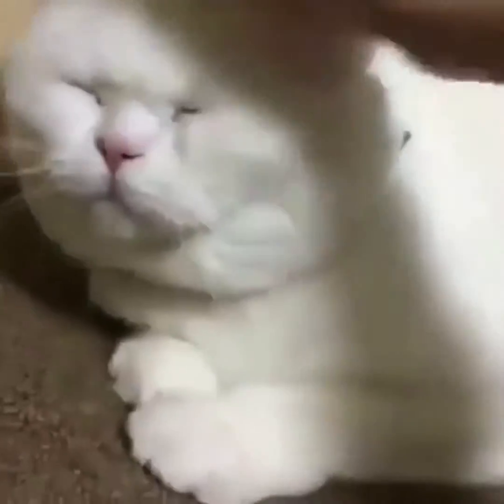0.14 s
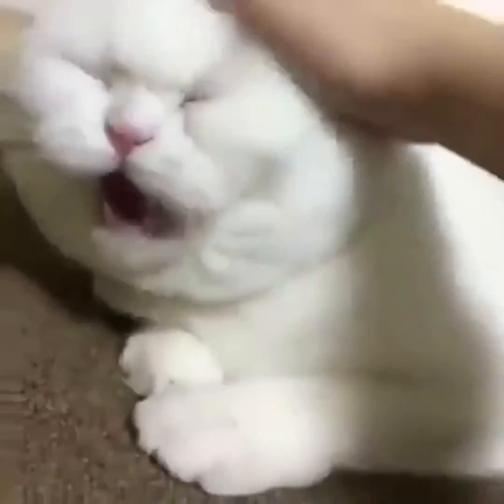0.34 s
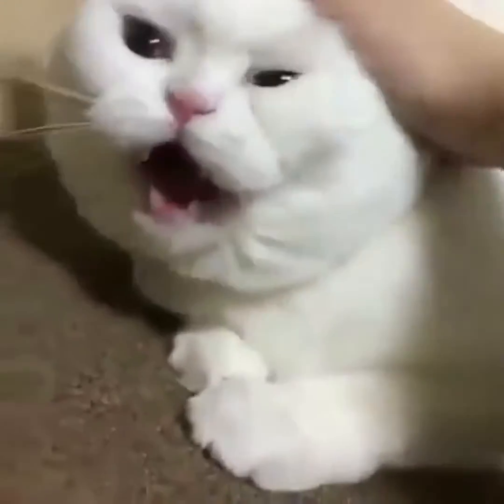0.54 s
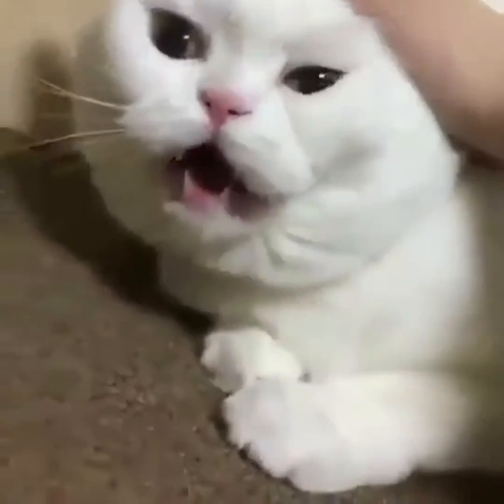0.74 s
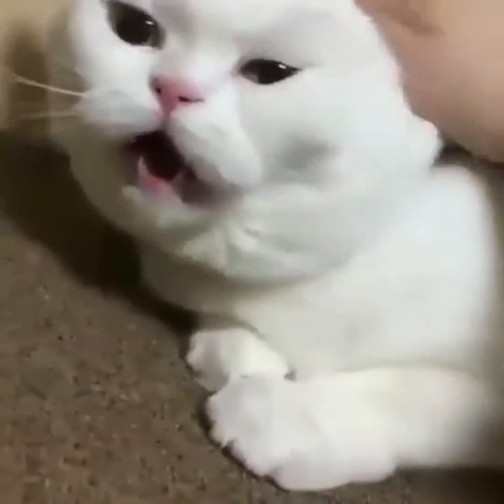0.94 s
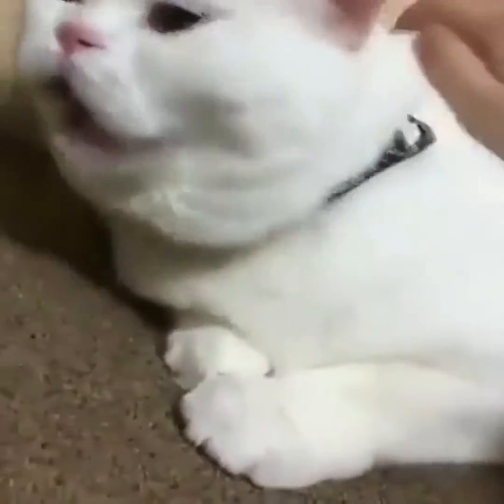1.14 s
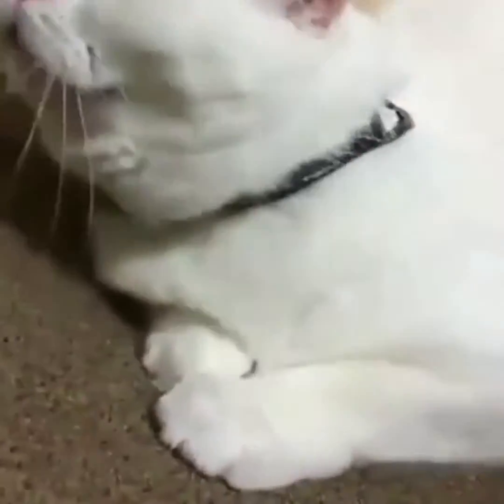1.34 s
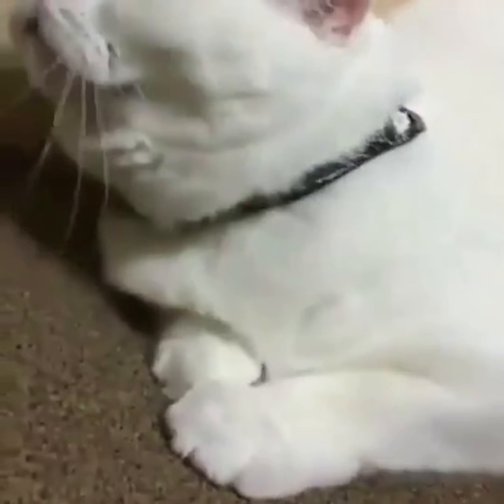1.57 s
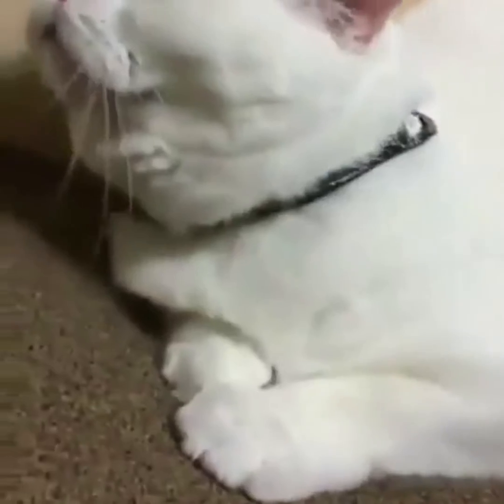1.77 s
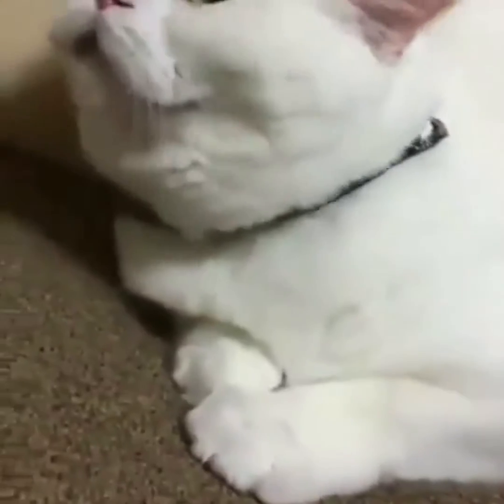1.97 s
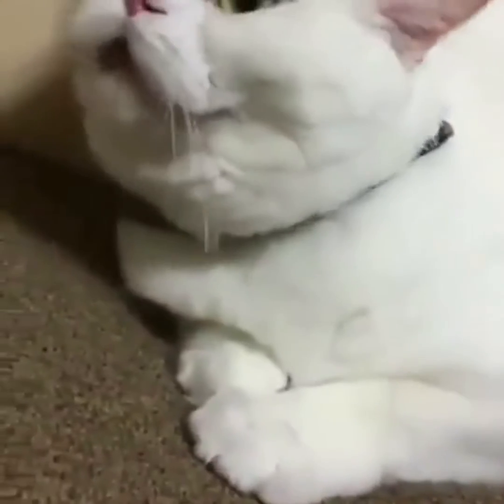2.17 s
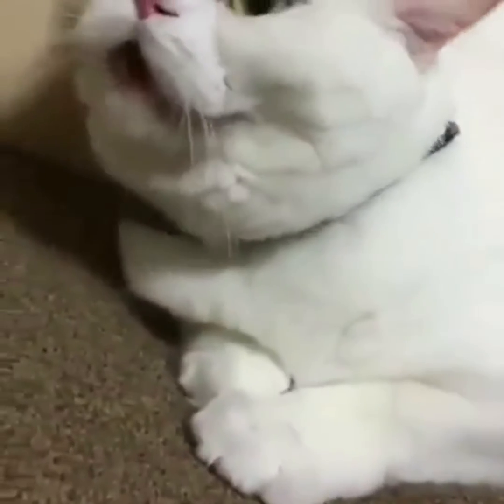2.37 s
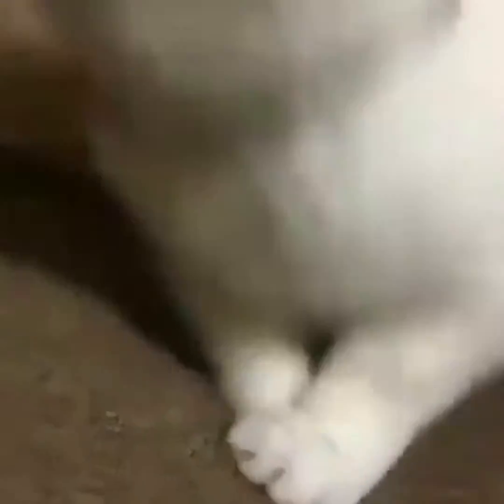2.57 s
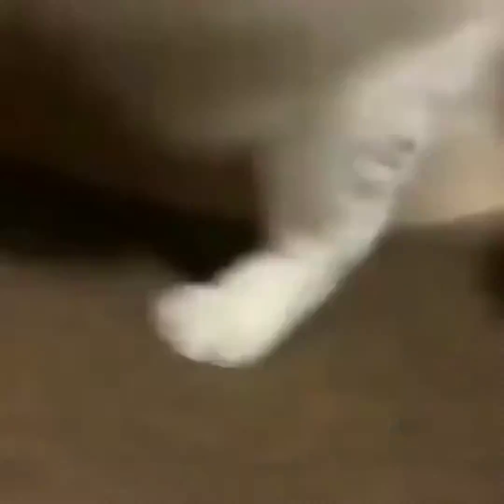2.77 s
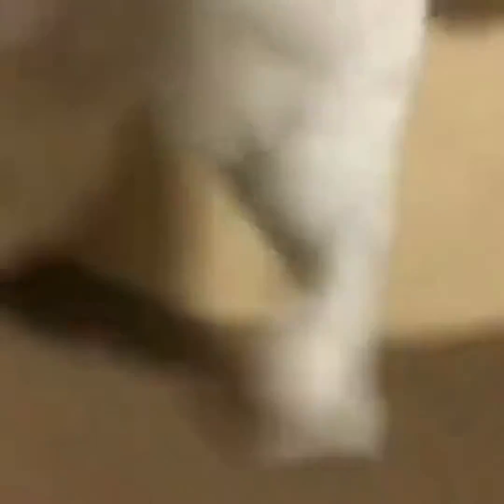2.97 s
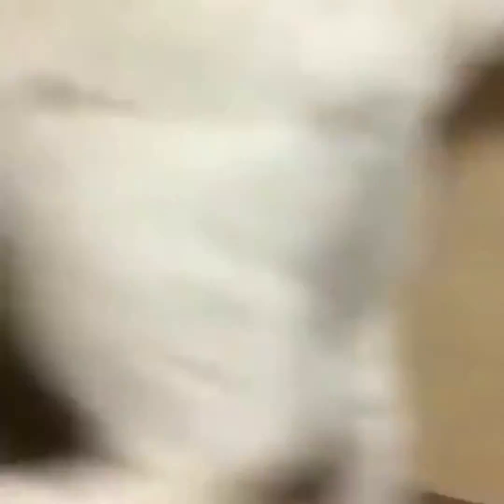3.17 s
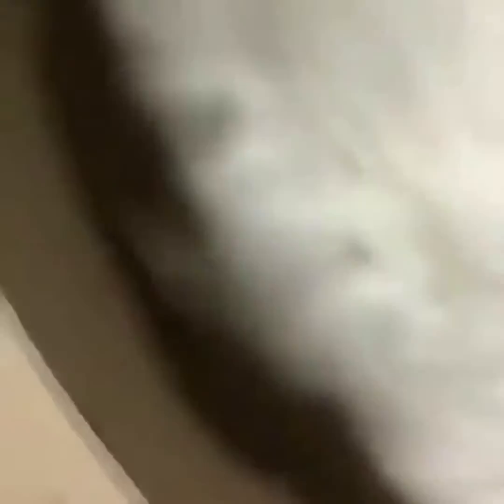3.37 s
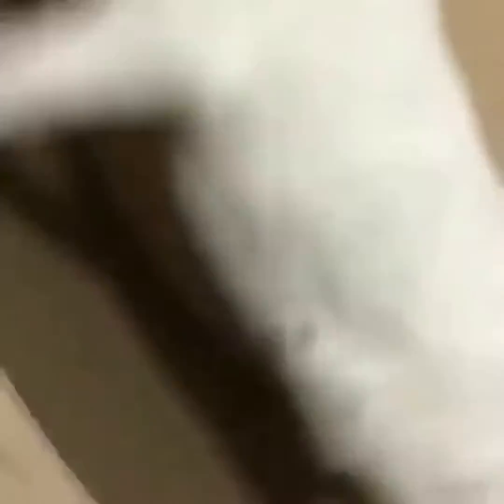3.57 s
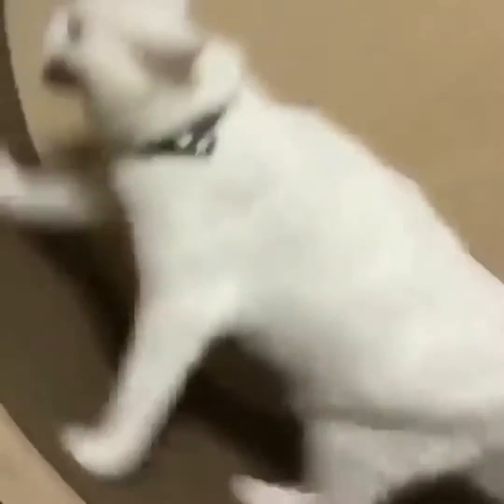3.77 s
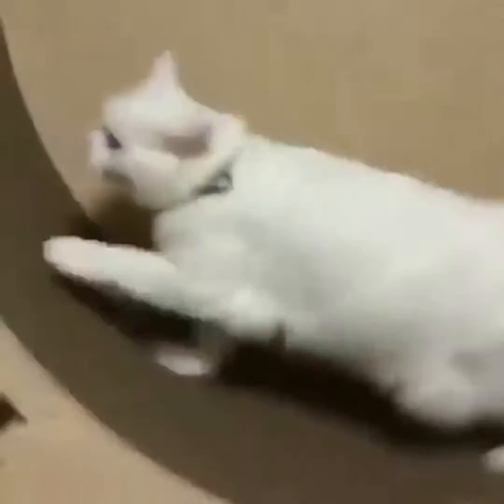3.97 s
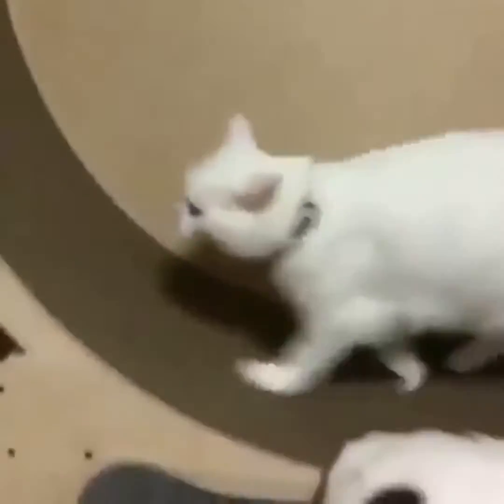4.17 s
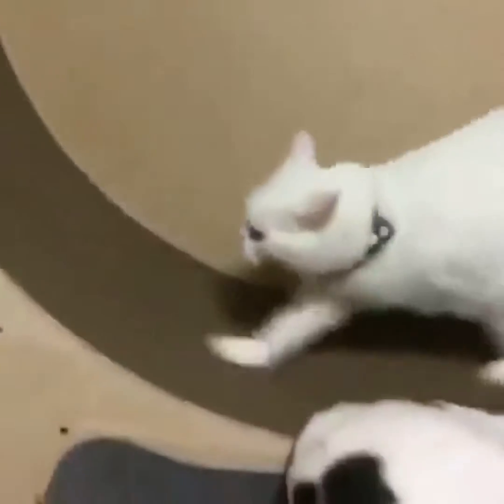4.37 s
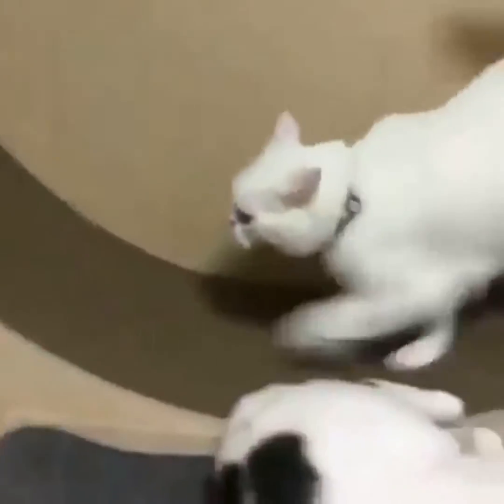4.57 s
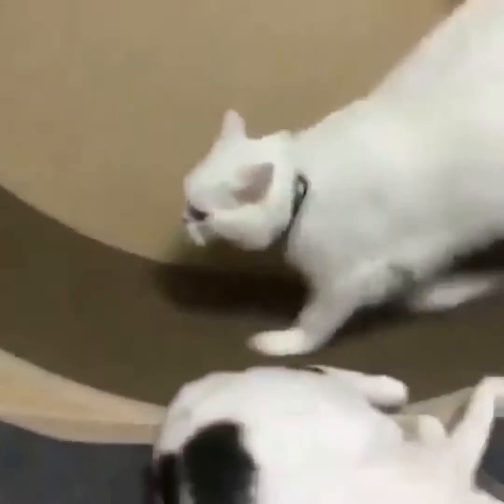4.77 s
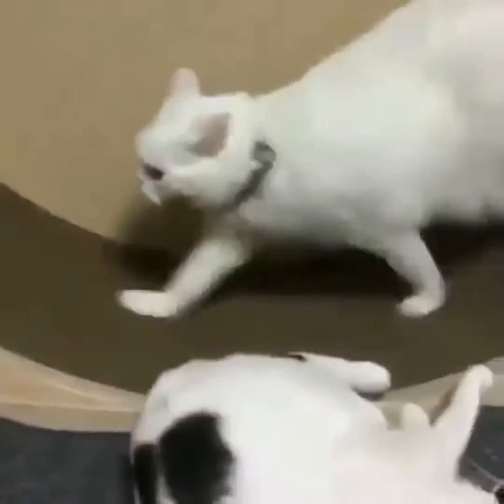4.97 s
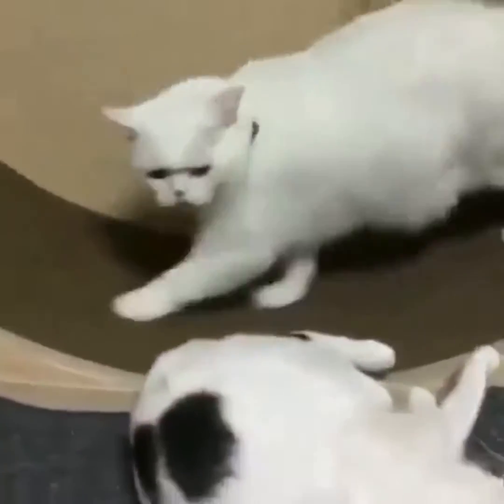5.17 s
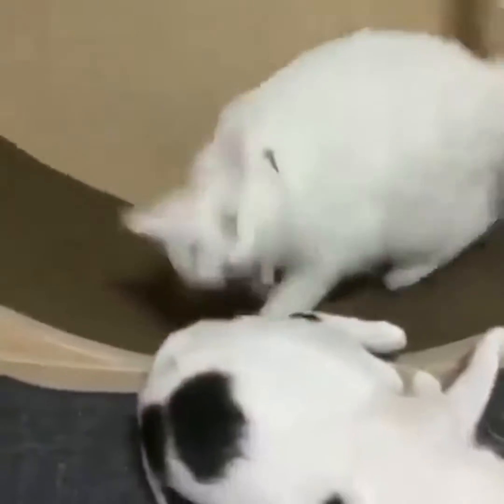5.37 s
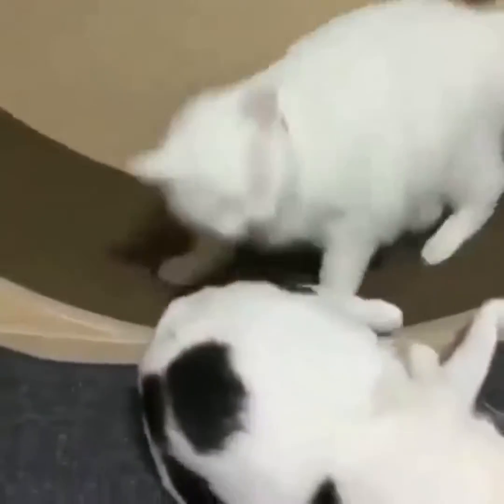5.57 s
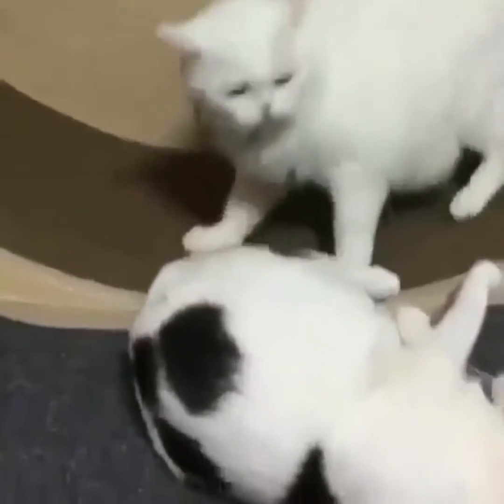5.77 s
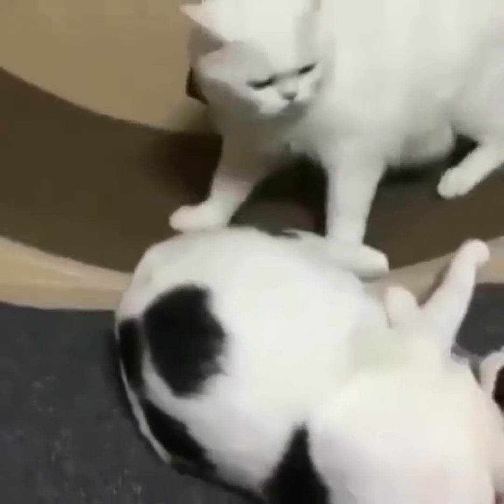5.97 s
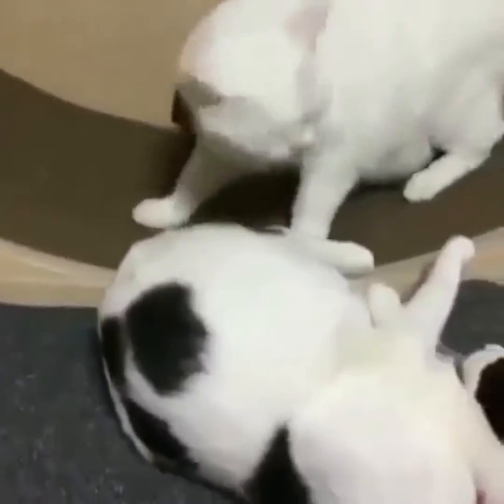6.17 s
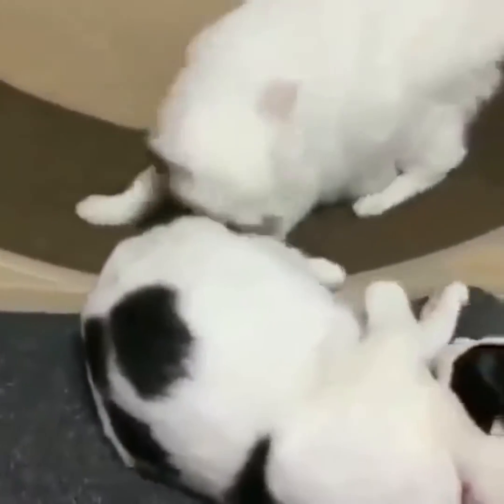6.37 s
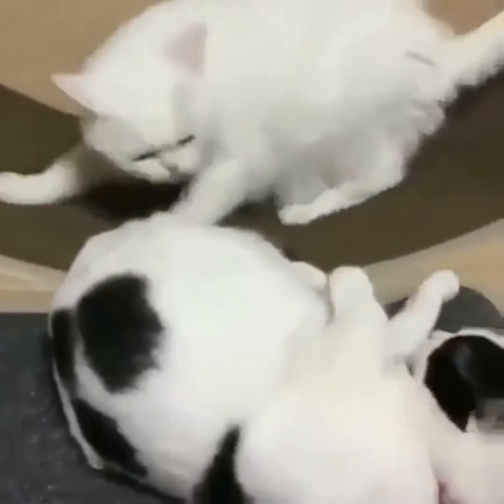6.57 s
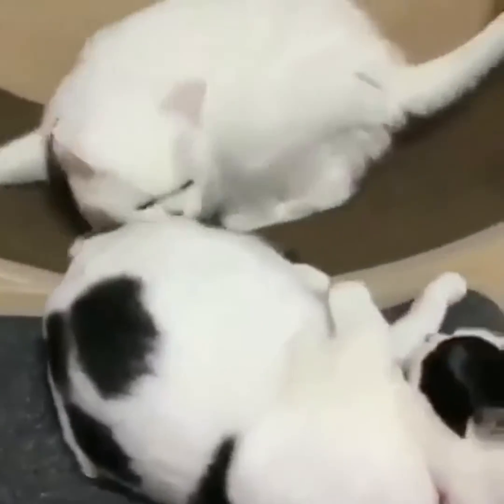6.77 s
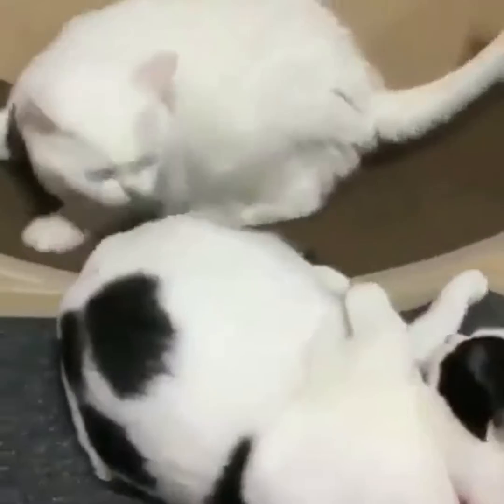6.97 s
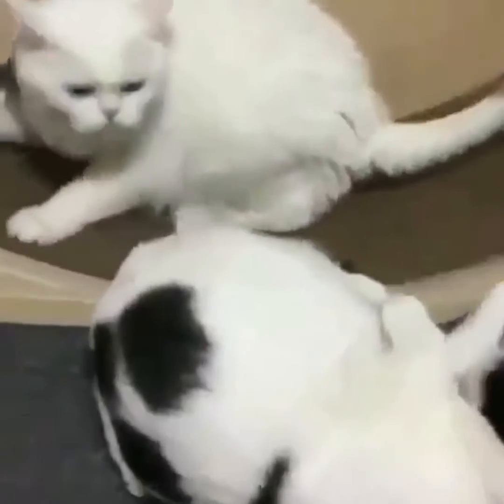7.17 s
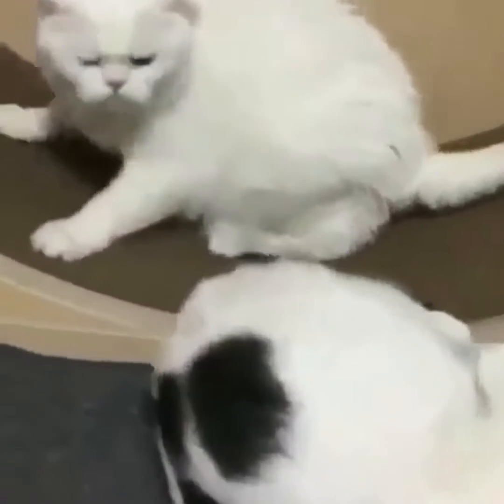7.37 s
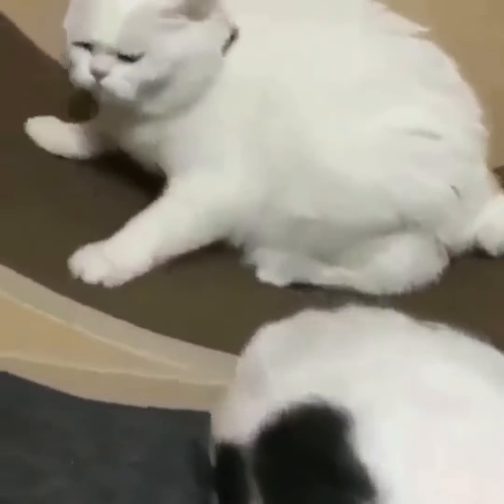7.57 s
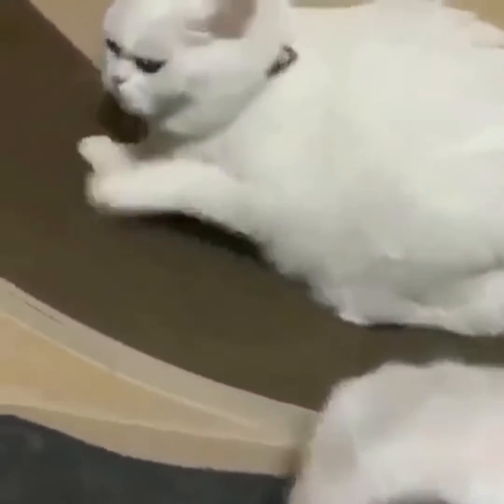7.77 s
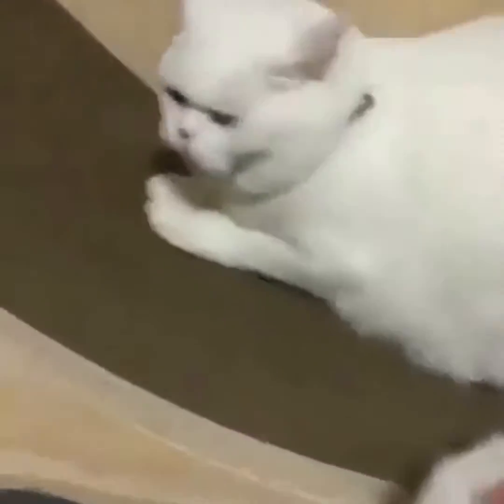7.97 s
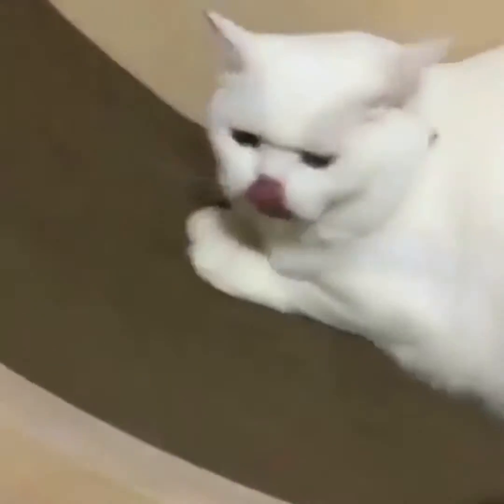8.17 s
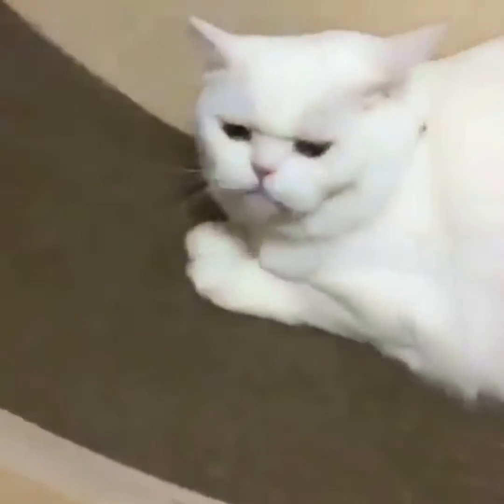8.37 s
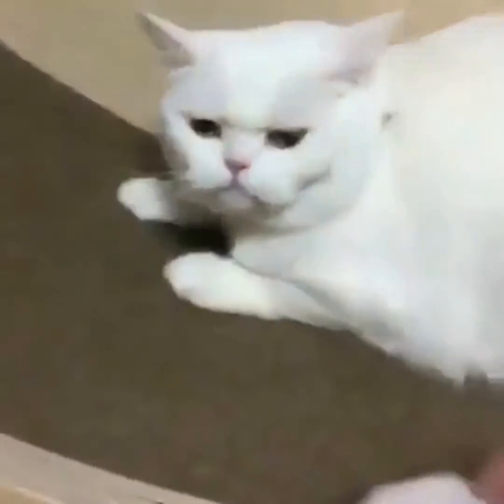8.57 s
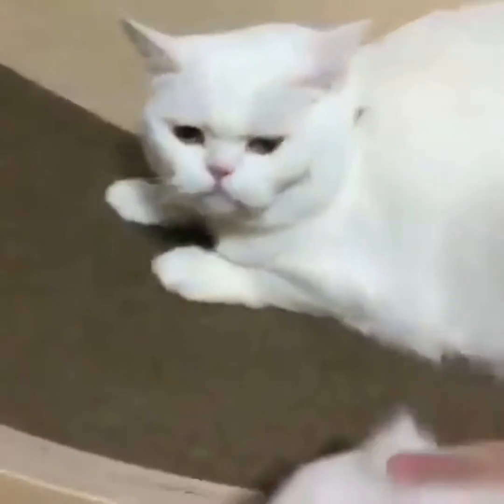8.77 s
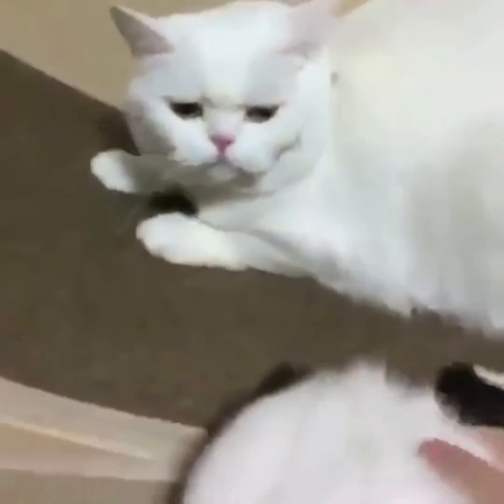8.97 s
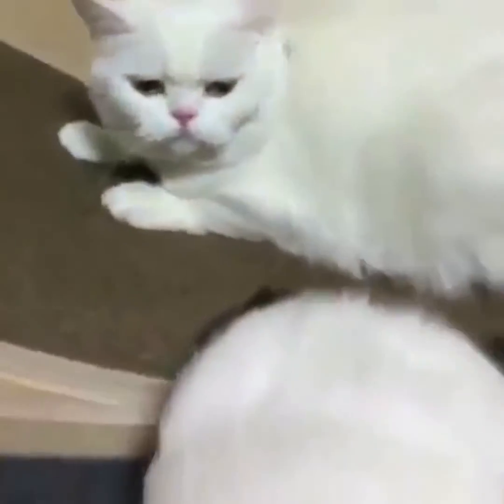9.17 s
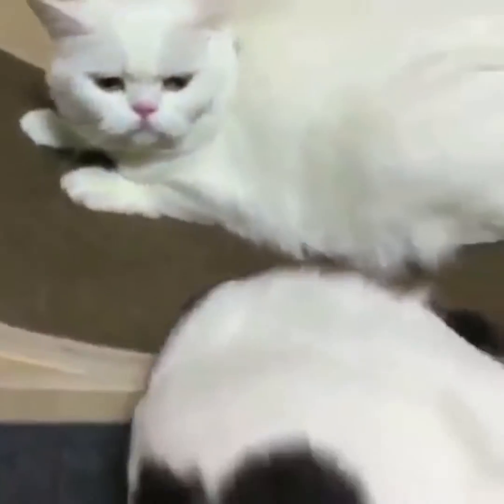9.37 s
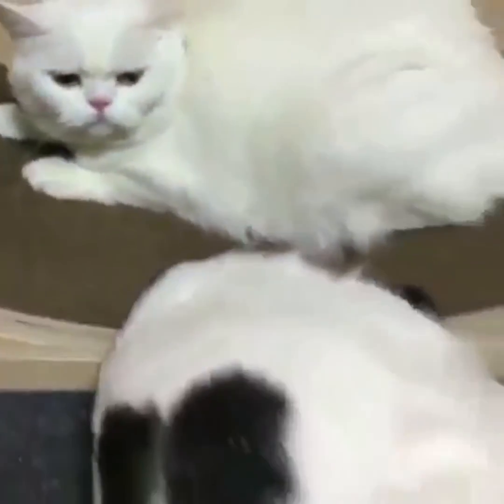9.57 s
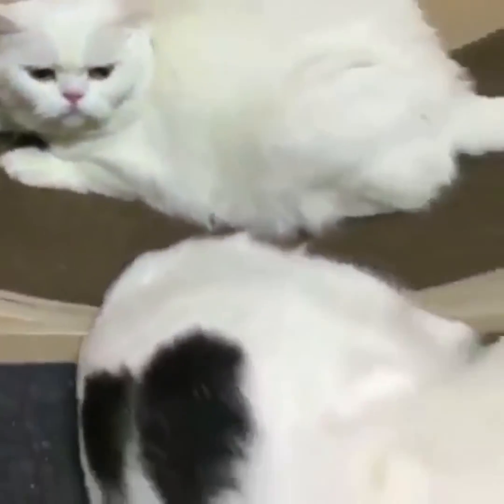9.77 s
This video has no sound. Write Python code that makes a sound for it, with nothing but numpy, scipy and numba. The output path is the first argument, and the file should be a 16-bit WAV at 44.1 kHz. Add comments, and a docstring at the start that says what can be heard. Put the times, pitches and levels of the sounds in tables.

```python
"""In a quiet carpeted room, under mains hum and hiss, a cat yowls close to a microphone.
It climbs onto a wooden running wheel that rumbles and knocks, then growls, yowls again and mews at a second cat.
The voice is source and filter: fold pulses and breath noise excite resonances of throat, mouth, palate and head.
The wheel is noise exciting drum modes; clicks are decaying noise cracks, thuds are damped low sines."""
import sys
import numpy as np
from scipy import signal
from scipy.io import wavfile
from scipy.ndimage import uniform_filter1d
from numba import njit

SR = 44100
rng = np.random.default_rng(int(sys.argv[2]) if len(sys.argv) > 2 else 0)


def int16_out(signal):
    """Quantize to a 16-bit WAV file."""
    q = np.round(np.clip(np.atleast_2d(signal).T, -1, 1) * 32767)
    wavfile.write(sys.argv[1], SR, q.astype(np.int16))


N = 433062  # samples in the scene


def undb(db):
    """Level law: decibels to amplitude gain."""
    return 10 ** (np.asarray(db) / 20)


def unit(x, span_s=0.):
    """Power normalisation: scale to rms 1, overall or over a sliding span."""
    power = uniform_filter1d(x ** 2, int(span_s * SR)) if span_s else np.mean(x ** 2)
    return x / np.sqrt(power + 1e-18)


@njit
def svf(x, tuning, damping):
    """State-variable band-pass: two integrators in a loop, retuned every sample, with unity gain at the peak."""
    y, band_state, low_state = np.empty(len(x)), 0., 0.
    for i in range(len(x)):
        g, k = tuning[i], damping[i]
        v = (band_state + g * (x[i] - low_state)) / (1 + g * (g + k))
        band_state = 2 * v - band_state
        low_state = low_state + 2 * g * v
        y[i] = k * v
    return y


def band(x, hz, width, order=1):
    """Resonance: a band-pass, repeated for steeper skirts."""
    tuning = np.tan(np.pi * hz / SR) + 0 * x
    damping = width / hz + 0 * x
    for _ in range(order):
        x = svf(x, tuning, damping)
    return x


def walk(rate, count=N):
    """Slow random modulation: a new normal level every 1 / rate s, joined by ramps; spread about 1.2."""
    hold = int(SR / rate)
    levels = np.repeat(rng.standard_normal(count // hold + 1), hold)
    return 1.512 * uniform_filter1d(levels, hold)[:count]


def coloured(points, flicker_db):
    """Spectral shaping of noise: half-octave bands follow the spectrum and flicker independently."""
    hz, db = np.transpose(points)
    out = 0
    for f in 35 * 2 ** np.arange(0, 8.9, .5):
        gain_db = np.interp(np.log(f), np.log(hz), db) + flicker_db * walk(16)
        out = out + undb(gain_db) * band(rng.standard_normal(N), f, f / 1.81, order=2)
    return unit(out)


# Spectrum of the room hiss. Each row: frequency in Hz, relative density in dB per Hz.
ROOM_SPECTRUM = [(15, -40), (25, -9), (43, -4.5), (122, -13), (313, -20), (567, -29.5), (1050, -28.5),
                 (1300, -30), (2230, -33.5), (2630, -34), (12200, -41.5), (15500, -41)]
# Mains hum. Each row: frequency in Hz, mean rms level in dB.
HUM_TONES = [(59.5, -76.5), (119, -65.5)]
ROOM_DB = -61


def room():
    """Stationary noise and tones: coloured hiss and rumble with a wavering mains hum."""
    t = np.arange(N) / SR
    hum = 0
    for hz, db in HUM_TONES:
        hum = hum + np.sqrt(2) * undb(db + 1.6 * walk(27.0)) * np.sin(2 * np.pi * hz * t)
    return undb(ROOM_DB) * coloured(ROOM_SPECTRUM, 1.3) + hum


# Wheel motion. Each row: time in seconds, deepest drum mode in dB, drum rumble in dB, roller hiss in dB.
WHEEL_LEVELS = [(2.8, -99, -99, -99), (2.85, -86, -86, -45), (2.92, -59, -60, -49), (3.03, -59, -65, -46.5),
                (3.059, -34, -49, -45.5), (3.13, -38, -24.5, -39.5), (3.18, -34, -46, -49.5),
                (3.42, -39, -34, -44), (3.63, -39, -29.5, -39), (3.87, -24.5, -24.5, -37.5),
                (4.19, -36, -30.5, -41), (4.6, -36.5, -31.5, -41), (5.06, -34, -28.5, -45),
                (5.22, -26.5, -32, -46.5), (5.36, -42, -33, -49), (5.68, -39, -33, -46),
                (5.97, -38, -49, -56), (6.12, -58, -62, -55), (6.3, -82, -89, -65), (6.5, -88, -95, -83)]
# Drum modes, deepest first. Each row: frequency in Hz, width in Hz, relative level in dB.
DRUM_MODES = [(54.5, 11, 0), (74, 25, 0), (109, 25, 1), (161.6, 49.4, 0.5), (231.8, 11, -4.5),
              (370, 250, -23)]
# Spectrum of the roller hiss. Each row: frequency in Hz, relative density in dB per Hz.
ROLLER_SPECTRUM = [(180, -4.5), (300, -2.5), (444, -26.5), (943, -5), (1110, -14.5), (6620, -32.5),
                   (12900, -47.5), (14300, -49), (15000, -85)]


def wheel():
    """Modal excitation: roller bumps shake the wooden drum and its stand; the rollers hiss in grains."""
    s, deep_db, drum_db, hiss_db = np.transpose(WHEEL_LEVELS)
    t = np.arange(N) / SR
    bumps = rng.standard_normal(N) * undb(1.2 * walk(40) + 1.3 * walk(9.0))
    deep, *modes = (undb(db) * unit(band(bumps, hz, width, order=2)) for hz, width, db in DRUM_MODES)
    hiss = coloured(ROLLER_SPECTRUM, 1.6) * undb(1.5 * walk(300))
    layers = [(deep, deep_db), (sum(modes), drum_db), (hiss, hiss_db)]
    return sum(unit(x) * undb(np.interp(t, s, db)) for x, db in layers)


def add(out, s, x):
    """Superposition: mix a short sound in at time s."""
    i = int(s * SR)
    out[i:i + len(x)] += x[:len(out) - i]


# Short clicks: claws and wood, a lip smack, a sharp voice pulse in a growl, soft scuffs.
# Each row: time of the crack in seconds, level in dB, centre in Hz, ring time to -60 dB in seconds,
# rise time constant of the lead-in in seconds.
CLICK_EVENTS = [(0.624, -33.5, 2600, 0.016, 0.0086), (0.641, -47, 1950, 0.023, 0.002),
                (3.047, -42.5, 1270, 0.08, 0.002), (3.062, -42, 3000, 0.016, .001),
                (3.101, -32, 1510, 0.024, 0.0018), (3.106, -33.5, 1780, .04, .001),
                (3.1794, -34, 1610, 0.05, 0.00089), (3.331, -37.5, 1460, 0.031, 0.0018),
                (3.465, -28, 1890, 0.034, 0.01), (3.474, -27.5, 2420, 0.013, .002),
                (3.831, -43, 1000, 0.022, 0.002), (3.922, -30, 1150, 0.031, 0.002),
                (3.9343, -28, 1190, 0.015, 0.0016), (4.1856, -22, 1670, 0.02, 0.0011),
                (4.555, -34, 1530, 0.053, 0.002), (5.651, -41, 1750, 0.017, .002),
                (7.9952, -56, 1410, 0.019, 0.0007), (9.092, -59, 2000, 0.037, 0.0019),
                (9.119, -53, 2400, .03, .002), (9.2197, -44, 2800, 0.046, 0.0018),
                (9.519, -60, 1500, .15, 0.023), (9.668, -63, 3700, .06, .008)]


def clicks():
    """Transient noise: a brief rising lead-in, then a broad crack that decays exponentially."""
    out, t, lead_s = np.zeros(N), np.arange(int(.2 * SR)) / SR, .03
    for s, db, hz, t60, rise_s in CLICK_EVENTS:
        noise = rng.standard_normal(len(t))
        crack = unit(band(noise, hz, 0.62 * hz)) + 0.016 * unit(band(noise, 6000, 11000))
        lead_in = 0.29 * np.exp((t - lead_s) / max(rise_s, 1e-4))
        ring = np.exp(-np.log(1000) * (t - lead_s) / t60)
        add(out, s - lead_s, 1.03 * undb(db) * crack * np.where(t < lead_s, lead_in, ring))
    return out


# Low thuds: paws, bumps of the wheel drum, and strong low pulses of the growl.
# Each row: start in seconds, level in dB, frequency in Hz.
THUD_EVENTS = [(2.859, -20.5, 277.3), (3.049, -23.5, 102), (3.118, -21, 92), (3.241, -26, 98),
               (3.316, -27, 102), (3.663, -17, 108.4), (3.72, -23.5, 189), (3.924, -15, 132),
               (4.191, -19, 193), (4.531, -18, 180), (4.569, -12, 178), (4.608, -13, 185),
               (4.65, -14.5, 182), (4.778, -20, 176), (5.23, -18, 186), (5.3, -16.5, 186), (5.38, -30, 185),
               (6.139, -38.5, 118), (8.239, -49.5, 71.7), (8.548, -58.5, 118.6), (8.906, -42.5, 55),
               (9.007, -42, 58), (9.215, -49, 174), (9.671, -33, 65)]


def thuds():
    """Damped oscillation: each thud is a few low cycles with a soft onset."""
    out, t = np.zeros(N), np.arange(int(.2 * SR)) / SR
    for s, db, hz in THUD_EVENTS:
        shape = np.exp(-t * hz / 2.6) * (1 - np.exp(-t / 0.0015))
        add(out, s, 1.07 * undb(db) * np.sin(2 * np.pi * hz * t) * shape)
    return out


# Hoarse spells of the voice. Each row: start in seconds, end in seconds, cycle irregularity from 0 to 1,
# depth of a slow second vibration from 0 to 1, strong-weak alternation from 0 to 1.
HOARSE_SPELLS = [(.6, .76, .035, .12, .3), (.76, .83, .035, .4, .05), (.83, 1.7, .008, .07, 0),
                 (1.95, 2.16, .06, .15, .08), (2.16, 2.46, .22, .25, .15), (2.46, 2.6, .045, .2, 0),
                 (2.6, 2.8, .04, .33, 0), (2.8, 2.95, .12, .3, .1), (4.0, 4.5, .27, .2, 0),
                 (4.5, 5.48, .5, .3, 0), (5.48, 5.76, .17, .3, .15), (5.76, 6.09, .045, .25, .1),
                 (6.35, 7.8, .33, .4, .25), (9.0, 9.45, .012, .2, 0), (9.5, 9.9, .07, .1, 0)]
CLEAR_RASP, CLEAR_DEPTH, RASP_BLEND_S = .005, .03, .05


def hoarseness(t):
    """Vibratory regularity: irregularity, throb depth and alternation, clear except in the hoarse spells."""
    state = np.array([[CLEAR_RASP], [CLEAR_DEPTH], [0]]) + 0 * t
    for start, end, *spell in HOARSE_SPELLS:
        state = np.where((t >= start) & (t < end), np.array(spell)[:, None], state)
    return uniform_filter1d(state, int(RASP_BLEND_S * SR))


@njit
def cycles(hz, rasp, pairing, chance):
    """Relaxation cycle of the folds, as phase and size: rasp is jitter and shimmer, pairing alternates strength."""
    phase, size, p, k = np.empty(len(hz)), np.empty(len(hz)), 0., 0
    for i in range(len(hz)):
        p += hz[i] * np.exp(rasp[i] * chance[k, 0]) / SR
        if p >= 1:
            p, k = p - 1, k + 1
        phase[i] = p
        size[i] = np.exp(rasp[i] * chance[k, 1]) * (1 + pairing[i] * (2 * (k % 2) - 1))
    return phase, size


THROB_HZ = 68.5  # centre of the second vibration's band
OVERTONE_DRIFT_DB = 3


def folds(hz, rasp, depth, pairing):
    """Glottal source: harmonic pulses and breath gated by the same cycles."""
    count = len(hz)
    # a looser, unsteady second vibration swells, chokes and bends the cycles
    throb = unit(band(rng.standard_normal(count), THROB_HZ, 45, order=2), .05)
    loose = depth * np.clip(throb, -1.4, 1.4)
    tremor = 1 + .0025 * walk(30, count=count) + .06 * loose
    phase, size = cycles(hz * tremor, rasp, pairing, rng.standard_normal((2000, 2)) * [.3, .35])
    size = uniform_filter1d(size, size=40) * (1 + loose)
    # the folds snap shut once a cycle: harmonics below 14 kHz, each swelling on its own
    harmonics = 0
    for k in range(1, 40):
        drift = undb(OVERTONE_DRIFT_DB * min(k / 8, 1) * walk(14, count=count))
        harmonics = harmonics + np.cos(2 * np.pi * k * phase) * (k * hz < 14000) * drift
    snap = unit(harmonics * size)
    breath = unit(rng.standard_normal(count) * np.exp(-phase / 4.3) * np.sqrt(size))
    return snap, breath


# Head resonances. Each row: frequency in Hz, width in Hz, overtone gain in dB, breath gain in dB.
HEAD_MODES = [(5350, 1700, -3.5, 2.5), (6480, 1600, -4.5, -2), (8000, 1400, -11.5, -9),
              (9200, 1100, -8.5, -22), (11900, 3000, -28, -14.5)]


def head_resonance(snap, breath, rasp):
    """Parallel formants: treble of alternating sign, with less overtone and more breath as rasp grows."""
    clear = np.exp(-rasp / .045)
    out = 0
    for k, (hz, width, voice_db, air_db) in enumerate(HEAD_MODES):
        source = undb(voice_db) * clear * snap + undb(air_db) * (.5 - .2 * clear) * breath
        out = out + (-1) ** k * band(source, hz, width, order=2)
    return out


# Palate resonance, moving with the tongue. Each row: time in seconds, frequency in Hz.
PALATE_TRACK = [(.66, 2720), (.76, 2710), (.9, 3430), (1.04, 3700), (1.06, 3270), (1.12, 3260), (1.4, 3120),
                (1.52, 2550), (1.68, 2180), (1.95, 2137), (2.14, 2140), (2.24, 2609), (2.45, 2500),
                (2.88, 2407), (5.5, 2443), (5.66, 3030), (5.8, 3180), (6.02, 2980), (6.12, 4280),
                (6.34, 4400), (6.47, 2900), (6.9, 3020), (7.03, 3320), (7.08, 2480), (7.7, 2405),
                (9.05, 2370), (9.26, 2710), (9.4, 2510)]
PALATE_WIDTH_HZ = 1500
THIN_ABOVE_HZ, THIN_WIDTH_HZ = 1000, 710  # the voice is thin in a band above the palate's
CHEST_HZ, CHEST_WIDTH_HZ, CHEST_DB = 125, 78, -8  # a growl rattles the chest; level against the fundamental
SINUS_HZ, SINUS_WIDTH_HZ, SINUS_DB = 1430, 790, -6.5  # upper nose resonance; level against the lower


def call(t, hz, base_db, throat_hz, throat_db, mouth_hz, mouth_db, palate_db, treble_db, nose_hz=900, nose_db=None):
    """Source-filter principle: fold pulses and gated breath ring chest, throat, mouth, palate and head."""
    first, count = int(round(t[0] * SR)), len(t)
    rasp, depth, pairing = hoarseness(t)
    palate_hz = np.interp(t, *np.transpose(PALATE_TRACK))
    snap, breath = folds(hz, rasp, depth, pairing)
    low = snap + (.01 + 1.7 * rasp) * breath
    # rasping folds close softly, so turbulence takes over the upper voice first
    high = (1 - rasp) * snap + (.012 + 2.2 * rasp) * breath
    mouth = band(high, mouth_hz, (.13 + .4 * rasp) * mouth_hz)
    mouth = band(mouth, mouth_hz, .9 * mouth_hz, order=3)
    parts = [(band(low, hz, hz * (0.57 + 0.076 * rasp), order=3), base_db),
             (band(low, throat_hz, 0.48 * throat_hz, order=3), throat_db),
             (-mouth, mouth_db),
             (band(high, palate_hz, PALATE_WIDTH_HZ, order=3), palate_db),
             (head_resonance(snap, breath, rasp), treble_db),
             # a raspy voice also flutters the chest below its pitch
             (band(low, 0.76 * hz, .5 * hz, order=2), base_db + 2.5 + 13.0 * np.log10(rasp))]
    if nose_db is not None:  # a growl also hums through nose and chest
        parts += [(band(high, nose_hz, 0.25 * nose_hz, order=3), nose_db),
                  (band(high, SINUS_HZ, SINUS_WIDTH_HZ, order=4), nose_db + SINUS_DB),
                  (band(low, CHEST_HZ, CHEST_WIDTH_HZ, order=2), base_db + CHEST_DB)]
    voice = sum(unit(x, 0.11) * undb(db) for x, db in parts)
    thin_band = band(voice, palate_hz + THIN_ABOVE_HZ, THIN_WIDTH_HZ)
    edge = np.clip(np.minimum(t - t[0], t[-1] - t) / 0.0038, 0, 1)
    out = np.zeros(N)
    out[first:first + count] = edge * (voice - thin_band)
    return out


def span(start_s, end_s):
    """Sampling: the sample times of a call."""
    return np.arange(int(start_s * SR), min(int(end_s * SR), N)) / SR


# Growls. Each row: start in seconds, end in seconds, attack in seconds, fold rate in Hz, glide in Hz per second,
# fundamental in dB, level slope in dB per second, throat in Hz, throat in dB, nose in Hz, nose in dB.
GROWL_EVENTS = [(4.102, 4.786, 0.088, 200.1, -14.5, -25, -13, 255, -32.5, 747, -53.5),
                (4.74, 5.544, 0.074, 185.8, 4.5, -40.5, 1.5, 246, -82, 810, -64.5),
                (5.49, 5.766, 0.024, 180.5, -2, -43.5, 2, 445, -46, 1070, -47),
                (6.345, 6.565, 0.02, 154.6, 60.5, -47.5, 8, 395, -40, 1020, -48),
                (6.5, 7.397, 0.055, 199.6, 1, -39, 0, 397, -43.5, 950, -52.5),
                (7.319, 7.687, 0.087, 205.7, -9, -38.5, 4.5, 435, -45, 850, -58),
                (9.569, 9.768, 0.05, 120.7, 2.5, -38, 14, 360, -50, 950, -77),
                (9.719, 9.92, 0.04, 131, 306, -36, 4, 340, -45, 960, -69)]
# The mouth opens in a snarl during a growl. Each row: widest moment in seconds, opening time in seconds,
# closing time in seconds, mouth in Hz, mouth in dB, palate in dB, treble in dB.
SNARL_EVENTS = [(5.655, 0.18, 0.15, 1720, -32, -54, -57), (6.616, 0.2, 0.13, 1780, -32, -55.5, -59),
                (6.995, 0.06, 0.13, 1960, -49.5, -47.5, -49), (7.12, 0.11, 0.24, 1860, -54.5, -56.5, -68),
                (9.799, 0.12, .1, 2200, -77, -75, -77)]
SHUT_DB = -104  # upper voice with the mouth shut
GAPE_KNEE = 0.18  # exponent below 1: the upper voice comes out as soon as the lips part
JAW_SAG_HZ_PER_S = 1150  # the mouth resonance sinks slowly once the snarl is past its widest
NOSE_SWELL = 0.35  # share of the attack and release, in dB, that the nose hum follows
GROWL_RELEASE_S, GROWL_WAVER_DB, GROWL_WANDER = 0.063, 3.5, .18  # wander: pitch share per unit of rasp


def growl(start, end, attack, hz, glide, base_db, fade, throat_hz, throat_db, shut_hz, shut_db):
    """Variable aperture: a held, wavering growl whose snarls open the mouth and let the upper voice out."""
    t = span(start, end)
    held = np.clip(np.minimum((t - start) / attack, (end - t) / GROWL_RELEASE_S), .03, 1)
    held_db = 20 * np.log10(held)
    effort_db = held_db + fade * (t - start)
    mouth_hz, upper_db = shut_hz + 0 * t, np.full((3, len(t)), 1. * SHUT_DB)
    for widest, opening, closing, wide_hz, *wide_db in SNARL_EVENTS:
        before = t < widest
        gape = np.interp(t, [widest - opening, widest, widest + closing], [0, 1, 0]) ** np.where(before, 1, 2)
        sagging_hz = wide_hz - JAW_SAG_HZ_PER_S * (t - widest)
        jaw_hz = np.where(before, shut_hz + gape * (wide_hz - shut_hz), sagging_hz)
        mouth_hz = np.where(gape > 0, np.maximum(jaw_hz, mouth_hz), mouth_hz)
        rise_db = np.maximum(np.array(wide_db)[:, None] - upper_db, 0)
        upper_db = upper_db + gape ** GAPE_KNEE * rise_db
    base_waver, throat_waver, nose_waver = [GROWL_WAVER_DB * walk(9.85, count=len(t)) for _ in range(3)]
    rasp = hoarseness(t)[0]
    hz = (hz + glide * (t - start)) * (1 + GROWL_WANDER * rasp * walk(12, count=len(t)))
    return call(t, hz, base_db + effort_db + base_waver, throat_hz, throat_db + effort_db + throat_waver,
                uniform_filter1d(mouth_hz, size=800), *upper_db,
                nose_hz=shut_hz, nose_db=shut_db + NOSE_SWELL * held_db + nose_waver)


# Two yowls and a mew. Each row: time in seconds, vocal fold rate in Hz, fundamental in dB, throat in dB,
# mouth in Hz, mouth in dB, palate in dB, treble in dB.
FIRST_YOWL_TRACK = [(0.66, 383, -62.5, -44, 2130, -49, -63.5, -59.5),
                    (0.68, 427, -48, -47, 2130, -29.5, -70, -70),
                    (0.71, 350, -42, -33.5, 2230, -26, -47.5, -62),
                    (0.79, 378, -40.5, -36.5, 2230, -26, -56, -52.5),
                    (0.91, 436.6, -54, -34, 2190, -25.5, -47.5, -57.5),
                    (1.0, 451, -44, -36, 2100, -27, -43.5, -56),
                    (1.015, 460, -43, -31.5, 2130, -29, -46, -49),
                    (1.045, 453, -37.5, -33.5, 2100, -30.5, -52, -62),
                    (1.07, 439, -44, -37.5, 2100, -33.5, -64, -55.5),
                    (1.13, 429.3, -49, -31, 1930, -28, -48, -50),
                    (1.2, 422.4, -50, -29, 1900, -27, -43.5, -46.5),
                    (1.3, 430, -52, -30.5, 1825, -26.5, -45, -53.5),
                    (1.38, 440, -52, -33.5, 1817, -27.5, -42, -49),
                    (1.41, 440.6, -47, -34, 2070, -29.5, -47, -48),
                    (1.48, 446, -47, -35, 2090, -36, -44, -52.5),
                    (1.58, 413.4, -38, -32, 1620, -44, -41, -59),
                    (1.67, 391.7, -32, -40, 1460, -36.5, -48.5, -74),
                    (1.78, 371.2, -29, -39, 1564, -40.5, -55.5, -71),
                    (1.93, 360, -32.5, -39.5, 1520, -51.5, -60, -73),
                    (2.02, 322.3, -35.5, -41.5, 1426, -45, -52.5, -66),
                    (2.14, 333.6, -36.5, -38, 1432, -50, -50.5, -67.5),
                    (2.24, 287, -27.5, -36.5, 1407, -42.5, -50.5, -55),
                    (2.29, 270.8, -26.5, -36, 1398, -44, -52.5, -63),
                    (2.33, 274.3, -30.5, -39, 1345, -39, -51, -61),
                    (2.36, 301.8, -38, -33.5, 1320, -46, -50, -64),
                    (2.42, 308.7, -33.5, -28, 1247, -35.5, -47, -54),
                    (2.49, 331.7, -46, -28, 1340, -41, -50.5, -59.5),
                    (2.6, 337.6, -45.5, -36, 1312, -20, -50, -52),
                    (2.69, 350, -42, -30.5, 1477, -27.5, -51, -52),
                    (2.85, 357.8, -40.5, -31, 1474, -22, -47, -43),
                    (2.86, 337.6, -41, -36, 1442, -31, -44, -46),
                    (2.88, 342, -55, -67, 1450, -75, -64, -47)]
SECOND_YOWL_TRACK = [(5.757, 345, -44, -54, 1370, -47, -70, -69),
                     (5.775, 352, -50, -57, 1410, -34.5, -77, -62),
                     (5.8, 386.4, -53, -40, 1790, -31.5, -68, -68),
                     (5.842, 414, -55, -45.5, 1790, -37, -58, -63),
                     (5.926, 399.5, -61, -44, 1900, -32.5, -45.5, -65),
                     (5.986, 400.4, -47.5, -43, 1865, -28, -38.5, -71),
                     (6.092, 429, -45.5, -49, 1370, -36.5, -59.5, -61.5),
                     (6.152, 389.3, -43, -42, 1570, -56, -66.5, -80),
                     (6.31, 360, -40, -51, 1400, -50.5, -76, -96),
                     (6.355, 357, -51, -41.5, 1493, -53, -69, -71)]
MEW_TRACK = [(9.045, 375, -90, -85.5, 1940, -91, -96.5, -93),
             (9.061, 385, -48, -71, 2020, -97, -92.5, -96.5),
             (9.099, 370.6, -44, -74.5, 1920, -85, -80, -80), (9.133, 458, -53, -54, 1860, -70, -70, -74.5),
             (9.201, 591, -61, -60, 1890, -58, -57, -57.5), (9.261, 628, -61, -54.5, 2300, -51.5, -62, -61),
             (9.33, 541, -56, -60, 1760, -58, -59, -65), (9.35, 513, -64, -66, 1700, -76, -73.5, -70.5),
             (9.375, 560, -70, -86, 1790, -91, -90, -83)]
YOWL_THROAT_HZ, SECOND_THROAT_HZ, MEW_THROAT_HZ = 983, 1026, 1100
PITCH_SLUR_S = .04


def yowl(table, throat_hz):
    """Articulated formants: in a sung call, pitch, mouth and levels glide along the table."""
    s, *columns = np.transpose(table)
    t = span(s[0], s[-1])
    hz, base_db, throat_db, *upper = (np.interp(t, s, c) for c in columns)
    slurred_hz = uniform_filter1d(hz, int(PITCH_SLUR_S * SR))
    return call(t, slurred_hz, base_db, throat_hz, throat_db, *upper)


ECHO_T60_S, ECHO_DB = .18, -22


def echo(near):
    """Reverberation by convolution: a short, soft tail of exponentially decaying noise."""
    t = np.arange(int(.4 * SR)) / SR
    tail = band(rng.standard_normal(len(t)), 900, 2400) * np.exp(-np.log(1000) * t / ECHO_T60_S) * (t > .004)
    return undb(ECHO_DB) * signal.fftconvolve(near, tail / np.sqrt(np.sum(tail ** 2)))[:N]


def scene():
    """Superposition: voice, clicks and thuds with their echo, over wheel and room."""
    sung = (yowl(FIRST_YOWL_TRACK, YOWL_THROAT_HZ) + yowl(SECOND_YOWL_TRACK, SECOND_THROAT_HZ)
            + yowl(MEW_TRACK, MEW_THROAT_HZ))
    growled = sum(growl(*g) for g in GROWL_EVENTS)
    near = sung + growled + clicks() + thuds()
    return (near + echo(near) + wheel() + room())[None]


BASS_CUT_HZ, CAPSULE_HZ, TOP_HZ = 36, 13500, 15600


def record(dry):
    """Band limiting: the capsule passes no deep bass and fades above its range; a steep filter cuts the top."""
    capsule = signal.butter(3, [BASS_CUT_HZ, CAPSULE_HZ], "bandpass", fs=SR, output="sos")
    top_cut = signal.ellip(10, .2, 70, TOP_HZ, fs=SR, output="sos")
    return signal.sosfilt(top_cut, signal.sosfilt(capsule, dry))


dry = scene()
out = record(dry)
int16_out(out)
```